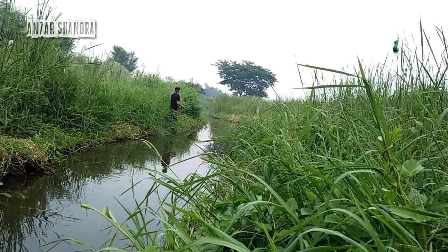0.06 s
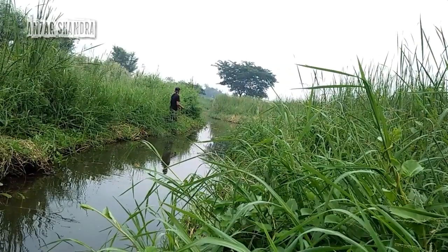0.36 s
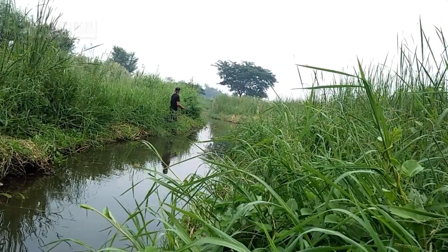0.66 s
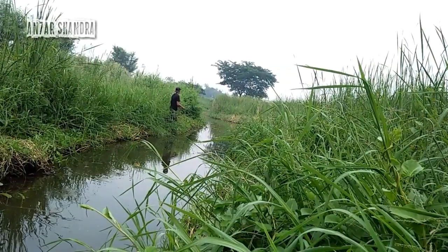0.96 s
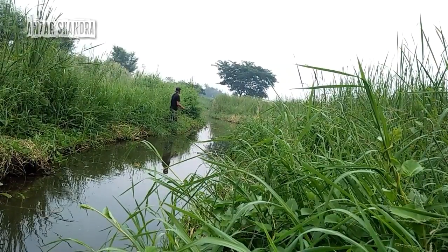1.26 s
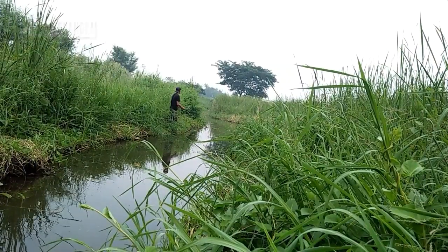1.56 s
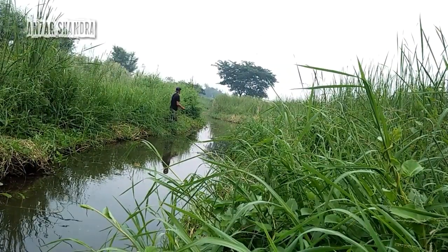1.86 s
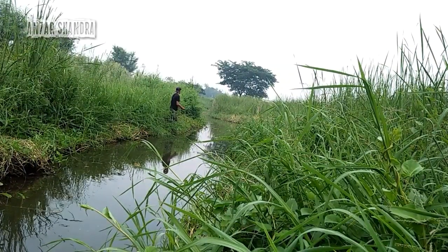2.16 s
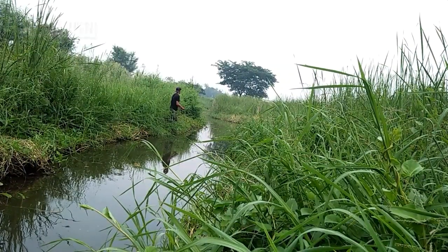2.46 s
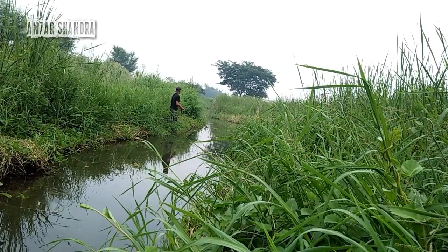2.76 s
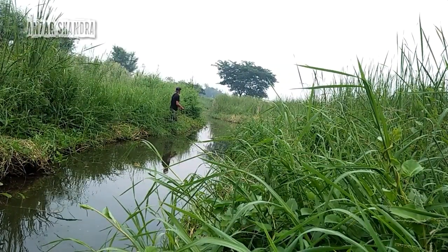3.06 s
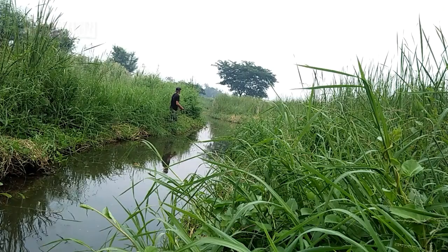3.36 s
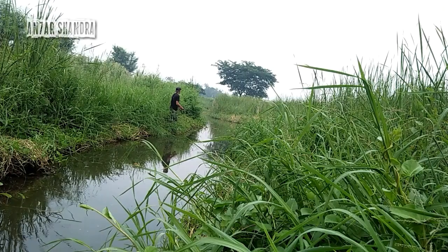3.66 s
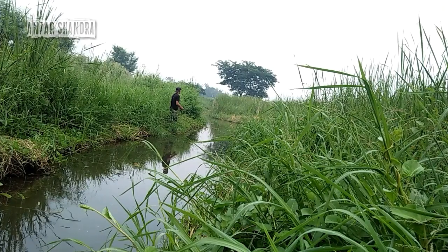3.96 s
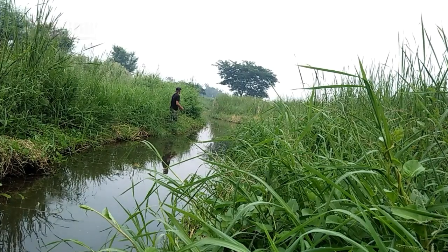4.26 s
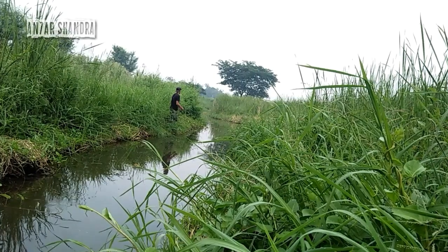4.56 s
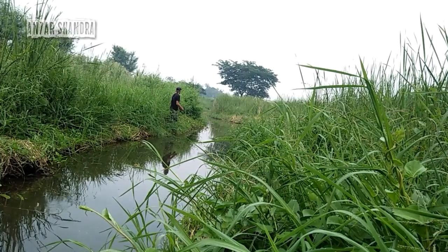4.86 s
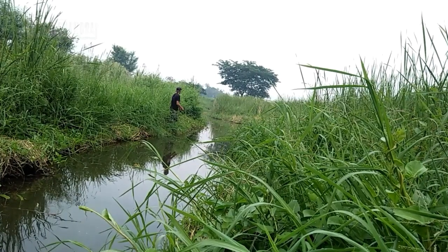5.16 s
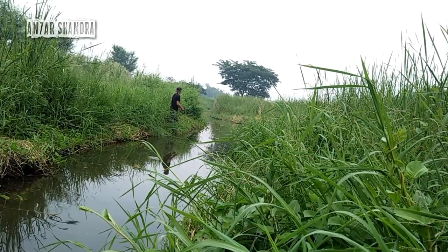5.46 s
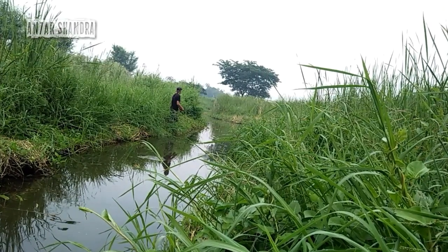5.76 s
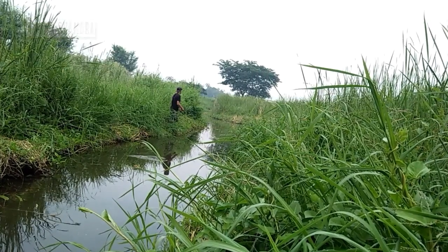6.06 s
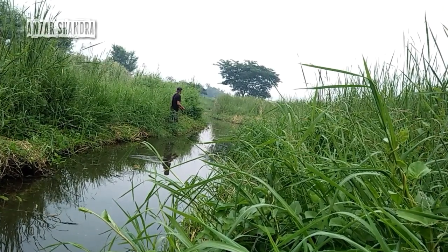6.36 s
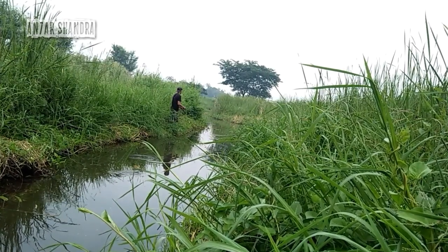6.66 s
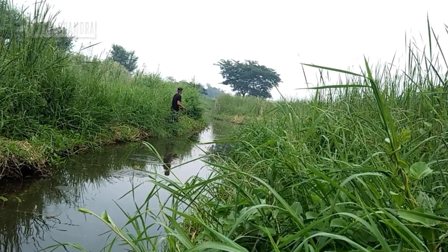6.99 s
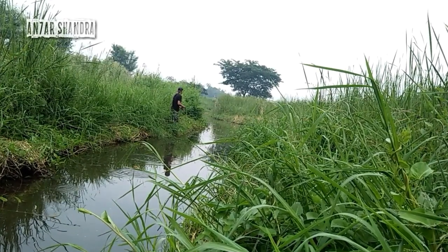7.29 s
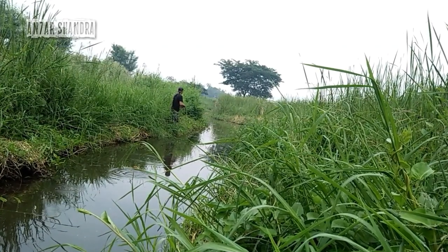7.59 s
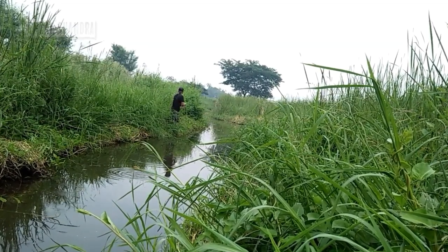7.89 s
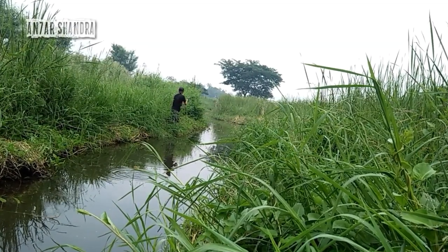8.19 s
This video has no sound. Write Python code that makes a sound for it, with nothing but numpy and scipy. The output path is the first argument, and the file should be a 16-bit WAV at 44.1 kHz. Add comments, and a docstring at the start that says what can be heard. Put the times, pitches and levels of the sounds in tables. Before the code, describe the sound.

Heard from a marsh bank, an angler casts: a sharp click from the reel, a quick swish of the rod, then a thin whizz of line ending in a brief rasp. A short hollow pop follows a little later, and tiny bubbles plip now and then. Insects keep up a shrill, chirping buzz throughout, while a small bird twitters faintly and soft puffs of wind rumble on the microphone.

```python
"""Casting in a reed marsh.

An angler casts: contacts ring the reel with a sharp clack, the rod sheds turbulence in a swish, and
line rubs off the spool until braked in a short rush. Later a cushioned blow gives a hollow pop.
Insects rasp against a resonance, a small bird twitters, a far one whoops and bubbles ring in the water.
Reeds scatter short echoes; a light breeze stirs the leaves and rumbles on the microphone."""
import sys
import numpy as np
from scipy import signal
from scipy.fft import rfft, irfft, next_fast_len
from scipy.io import wavfile
from scipy.ndimage import uniform_filter1d

SR = 44100
rng = np.random.default_rng(int(sys.argv[2]) if len(sys.argv) > 2 else 0)


def digitize_waveform(pressure):
    """Quantize a signal to 16-bit integers and store it at the path in sys.argv[1].

    Rows of a 2-D input are taken as channels; values are limited to [-1, 1].
    """
    field = np.atleast_2d(pressure).T
    bounded = np.clip(field, -1, 1)
    quanta = np.round(bounded * 32767).astype(np.int16)
    wavfile.write(sys.argv[1], SR, quanta)


N = 367353
T = np.arange(N) / SR

# Spectra of the air's hush, the leaves and eddies at the microphone: (frequency [Hz], relative level [dB])
AIR_SPECTRUM = [(120, 10), (200, -1), (300, -2), (480, -0.5), (750, 3), (1100, -4), (1700, -3), (2600, -11),
                (4000, -11), (6000, -19.5), (11000, -12.5), (14300, -22)]
LEAF_SPECTRUM = [(400, -18), (1000, 5), (1600, -1), (2500, -3), (3500, -11.5), (6000, -14), (14300, -9)]
EDDY_SPECTRUM = [(12, -17), (28, -31), (45, -0.5), (56, -7), (63, 2.5), (71, -6.5), (85, -3), (110, -19.5),
                 (160, -23), (220, -40.5), (400, -71)]
# Puffs on the microphone and stirs of air in the leaves: (centre time [s], duration [s], level [dB])
GUSTS = [(.03, 0.09, -46.5), (.22, 0.24, -55), (.62, 0.057, -52), (1.095, 0.084, -51.5), (1.18, .07, -55),
         (1.31, 0.054, -56), (1.48, 0.063, -56), (1.95, 0.04, -53), (3.14, 0.035, -48.5),
         (3.36, 0.036, -48.5), (3.58, 0.064, -53), (3.69, .07, -53.5), (4.8, 0.17, -55.5),
         (5.385, 0.18, -52.5), (5.68, 0.14, -57), (5.805, 0.1, -50), (5.998, 0.086, -46.5),
         (6.25, 0.38, -51.5), (6.5, 0.28, -51), (6.9, 0.14, -52.5), (7.05, 0.23, -52), (7.52, 0.19, -53),
         (8.04, 0.34, -53)]
RUSTLES = [(3.15, 0.49, -73.5)]

# The far bird's rising whoops: (time [s], peak level [dB])
WHOOPS = [(0.071, -63.5), (.31, -71), (.55, -66), (0.775, -70), (1.011, -68.5), (1.23, -67.5)]
# Faint distant hoots: (time [s], duration [s], pitch [Hz], level [dB])
HOOTS = [(0.551, 0.51, 440, -76), (3.77, 0.13, 742, -76), (6.193, 0.11, 899, -70),
         (6.708, 0.078, 735, -66.5), (7.078, 0.14, 901, -69.5), (7.253, 0.2, 701, -73),
         (7.994, 0.23, 451, -72.5)]
# The small bird's phrase of falling slurs: (time before its end [s], pitch [Hz], relative level [dB])
SLURS = [(.5, 3850, -2.5), (0.46, 4100, 2), (.39, 4270, -0.5), (.365, 4680, -1.5), (.265, 4470, -1.5),
         (.2, 4580, -2.5), (0.2, 5130, -3), (.16, 4150, -1.5), (.08, 3730, 3.5), (.045, 4620, -4.5),
         (.028, 4020, 0.5)]
# It sings the whole phrase or only the last part: (end time [s], slurs [count], level [dB])
PHRASES = [(.78, 11, -65), (1.238, 7, -73), (2.07, 9, -60.5), (3.585, 8, -73), (4.001, 11, -66),
           (4.579, 4, -70), (4.73, 3, -71), (5.246, 8, -69), (5.41, 3, -66), (6.62, 6, -79),
           (6.96, 9, -65.5), (7.54, 11, -72), (8.04, 7, -68.5), (8.36, 6, -67)]
# Two arched notes: (delay [s], duration [s], first pitch [Hz], middle pitch [Hz], last pitch [Hz])
FLOURISH_NOTES = [(0, .05, 2850, 3430, 2350), (.06, .056, 2650, 3500, 2800)]
# That flourish, closing most phrases, and higher arched calls: (time [s], level [dB])
FLOURISHES = [(.772, -66), (2.058, -64.5), (3.584, -66), (3.995, -67), (5.235, -67.5), (5.395, -68),
              (6.952, -65.5), (7.545, -68)]
HIGH_CALLS = [(0.502, -60.5), (0.831, -61.5), (1.338, -58), (3.41, -71), (3.76, -65), (4.061, -65)]

# The insects' resonance and the band above it: (frequency [Hz], relative level [dB])
BUZZ_SPECTRUM = [(5800, -46.5), (6500, -35.5), (6950, -22.5), (7250, -13), (7450, -10.5), (7750, -6),
                 (8020, -0.5), (8300, -19), (8650, -19), (9200, -52.5)]
UPPER_BUZZ_SPECTRUM = [(8000, -22.5), (8700, -2), (9400, 0.5), (10000, 1.5), (10300, -9.5), (10800, -16.5),
                       (12000, -25.5), (14300, -17.5)]
# Envelope of the insect chorus: (time [s], level [dB])
CHORUS_LEVEL = [(0.0, -56), (0.22, -45), (0.7, -52), (2.04, -47), (2.16, -54.5), (2.26, -48.5),
                (2.62, -54.0), (3.68, -46.1), (4.36, -53.9), (4.46, -48), (5.1, -51), (5.22, -57),
                (5.32, -49.5), (6.04, -51.5), (6.14, -48), (6.36, -50), (6.54, -45), (6.74, -49.5),
                (7.92, -48.5), (8.04, -53), (8.22, -51.5), (8.32, -47)]
# Runs of chirps at a steady pace: (first chirp [s], rate [1/s], chirps [count])
CHIRP_RUNS = [(0.061, 7.64, 19), (2.508, 10.96, 4), (2.904, 10.84, 16), (4.4, 11.92, 9), (5.154, 9.0, 4),
              (5.622, 8.18, 23)]
# Brief dips as the near insects rest: (centre time [s], duration [s])
RESTS = [(0.162, 0.018), (2.645, .035), (2.844, 0.094), (3.086, 0.031), (4.364, 0.026), (4.596, 0.052),
         (5.561, 0.07), (5.937, 0.031), (6.037, 0.081), (7.156, 0.025)]

# Ringing bubbles: (time [s], duration [s], first pitch [Hz], last pitch [Hz], level [dB])
BUBBLES = [(0.54, 0.016, 1015, 1086, -50), (0.56, .016, 980, 990, -53.5), (0.619, 0.025, 1020, 1050, -54),
           (0.757, 0.019, 980, 860, -52), (2.604, 0.04, 2750, 2720, -66), (2.708, 0.016, 563, 630, -52),
           (5.31, 0.032, 590, 1354, -46.5), (5.326, 0.014, 2190, 2200, -49.5),
           (5.687, 0.038, 1043, 1150, -59.5), (5.726, 0.0064, 720, 920, -48),
           (5.733, 0.0087, 630, 1250, -46), (5.846, 0.011, 1820, 2060, -57), (6.675, 0.027, 948, 1770, -44),
           (7.105, 0.0083, 1970, 2840, -44.5), (7.584, 0.015, 1115, 1270, -54),
           (7.604, 0.01, 2470, 2420, -50)]
# Blows that excite the pop: (time [s], force level [dB])
POP_BLOWS = [(4.0155, -36), (4.0218, -39), (4.0213, -10.5)]
# Modes of the pop: (frequency [Hz], gain [dB], 60 dB decay time [s])
POP_MODES = [(1140, -19, 0.012), (1316, -4, 0.01), (1530, -5.5, 0.0081), (2580, -9, 0.0034)]
# Envelope of the fizz around the pop: (time [s], level [dB])
FIZZ_LEVEL = [(4.005, -84), (4.017, -47), (4.022, -36.5), (4.028, -49.5), (4.05, -57.5), (4.1, -64.5),
              (4.2, -75)]
# Spectrum of that fizz: (frequency [Hz], relative level [dB])
FIZZ_SPECTRUM = [(350, -28), (750, 0), (1400, 3.5), (2500, -3.5), (5000, -6.5), (10000, -10.5),
                 (14300, -16)]

# Contacts on the reel: (time [s], force level [dB], contact cut-off [Hz], relative rattle level [dB])
REEL_CONTACTS = [(0.157, -47, 6000, -13.5), (0.1812, -36, 15100, 1), (0.182, -19.5, 11800, -13.5),
                 (0.185, -22.5, 6000, -21), (1.116, -64, 12000, -17.5), (1.211, -54, 14000, -21),
                 (4.204, -57, 15000, -19), (5.457, -50, 9000, -23.5)]
# Modes of the tackle: (frequency [Hz], gain [dB], 60 dB decay time [s])
TACKLE_MODES = [(1190, -10, 0.0053), (2570, 0.5, 0.0027), (2960, -37, 0.0074), (3740, -19, 0.007),
                (6000, -2, 0.0033), (6900, -20, .004), (11700, -8.5, 0.0024)]
# Spectra of the rod's swish and the line's run, braking and hiss: (frequency [Hz], relative level [dB])
SWISH_SPECTRUM = [(120, -64), (200, -40), (391, -16), (531, -21.5), (710, -10.5), (1100, -7.5),
                  (1780, -2.5), (2600, -8.5), (4650, -8), (6500, -25.5), (8450, -54), (14300, -120)]
RUN_SPECTRUM = [(180, -42), (300, -22), (337, -48), (593, -3), (1320, -2), (2150, 0.5), (3290, -9.5),
                (4650, -6.5), (6500, -23), (8450, -51), (14300, -120)]
BRAKE_SPECTRUM = [(200, -50), (450, -58), (700, -3.5), (880, -5.5), (1060, 6.5), (1240, -9.5), (1600, 1),
                  (2000, -0.5), (2400, -6.5), (3000, -11), (4600, -14), (6500, -31), (9000, -55)]
HISS_SPECTRUM = [(4500, -31), (6500, -0.5), (9000, 6.5), (12000, 3.5), (14300, 3)]
# The rod whips through the air: (time [s], peak level [dB], rise [dB/s], fall [dB/s])
SWISHES = [(1.457, -36.5, 598, 750), (1.498, -35.5, 750, 218)]
# The line is braked: (time [s], peak level [dB], rise [dB/s], fall [dB/s], relative hiss level [dB])
SNATCHES = [(2.233, -51, 400, 204, -6), (2.279, -45, 453, 350, -10), (2.305, -33.5, 850, 850, -23),
            (2.347, -52, 1800, 1500, -16)]
# The rod's whistle sinks as it slows: (time [s], pitch [Hz], level [dB])
ROD_SWOOSH = [(1.44, 1891, -56), (1.495, 1650, -45), (1.53, 1142, -46), (1.57, 865, -52), (1.63, 613, -78),
              (1.7, 598, -78)]
# The line's thin whizz rises, then sinks as the lure slows: (time [s], pitch [Hz], level [dB])
LINE_WHIZZ = [(1.5, 10900, -80), (1.6, 11400, -65), (1.75, 13500, -76), (1.9, 14000, -65),
              (2.05, 13700, -74.5), (2.17, 12300, -64), (2.26, 11000, -68), (2.34, 9500, -90)]


def from_db(db):
    """Amplitude ratio of a level in decibels."""
    return 10 ** (np.asarray(db) / 20)


def rms_one(x):
    """Normalisation to unit mean power."""
    return x / np.sqrt(np.mean(x ** 2) + 1e-20)


def in_time(rows):
    """Linear interpolation of each column of a curve at every sample."""
    times, *columns = np.transpose(rows)
    return [np.interp(T, times, column) for column in columns]


def add(out, s, sound):
    """Superposition: a sound joins the mix at time s."""
    at = max(round(s * SR), 0)
    out[at:at + len(sound)] += sound[:max(N - at, 0)]


def swell(rows):
    """Amplitude envelope from a curve's last column, silent outside its span."""
    return from_db(in_time(rows)[-1]) * (T > rows[0][0]) * (T < rows[-1][0])


def peak(s, db, rise_db_per_s, fall_db_per_s):
    """Exponential growth to a peak at time s, then exponential decay."""
    slope = np.where(T < s, rise_db_per_s, fall_db_per_s)
    return from_db(db - np.minimum(np.abs(slope * (T - s)), 200))


def humps(rows):
    """An envelope of superposed raised-cosine swells."""
    out = np.zeros(N)
    for s, length, db in rows:
        add(out, s - length / 2, from_db(db) * np.hanning(int(length * SR)))
    return out


def gate(start, end, rise_s, fall_s):
    """A trapezoidal envelope, its edges centred on the two times."""
    corners = [start - rise_s / 2, start + rise_s / 2, end - fall_s / 2, end + fall_s / 2]
    return np.interp(T, corners, [0, 1, 1, 0])


def drift(rate):
    """Random modulation of unit rms, passing through `rate` new values a second."""
    return rms_one(np.interp(T * rate, np.arange(N // 20), rng.standard_normal(N // 20)))


def noise(spectrum):
    """Spectral shaping of white noise, at unit rms."""
    size = next_fast_len(N)
    hz, db = np.transpose(spectrum)
    bin_hz = np.maximum(np.arange(size // 2 + 1) * SR / size, 1)
    gain = from_db(np.interp(np.log(bin_hz), np.log(hz), db))
    return rms_one(irfft(rfft(rng.standard_normal(N), size) * gain, size)[:N])


def narrow_noise(hz, width_hz):
    """Random quadrature modulation spreads a steady or gliding pitch into a band of unit rms."""
    phase = 2 * np.pi * np.cumsum(hz + np.zeros(N)) / SR
    return rms_one(drift(width_hz) * np.cos(phase) + drift(width_hz) * np.sin(phase))


def low_pass(x, hz):
    """Two-pole attenuation above a cut-off."""
    return signal.sosfilt(signal.butter(2, min(hz, .45 * SR), fs=SR, output="sos"), x)


def whistle(length, first_hz, middle_hz, last_hz, waver=0.0216):
    """Frequency modulation: a sine swells and fades as its unsteady pitch bends through three points."""
    progress = np.linspace(0, 1, max(int(length * SR), 8))
    parabola = np.polyfit([0, .5, 1], [first_hz, middle_hz, last_hz], 2)
    unsteadiness = np.interp(progress, np.linspace(0, 1, 10), rng.standard_normal(10))
    hz = np.polyval(parabola, progress) * (1 + waver * unsteadiness)
    return np.sin(2 * np.pi * np.cumsum(hz) / SR) * np.abs(np.sin(np.pi * progress)) ** .3


def ring(force, modes):
    """Modal resonance: a force drives damped oscillators, whose sum is high-passed."""
    out = np.zeros(N)
    for hz, db, t60 in modes:
        radius = from_db(-60 / (t60 * SR))
        pole_real = radius * np.cos(2 * np.pi * hz / SR)
        out += from_db(db) * signal.lfilter([1, -pole_real], [1, -2 * pole_real, radius ** 2], force + 1e-18)
    return signal.sosfilt(signal.butter(4, 700, "high", fs=SR, output="sos"), out)


def reeds(x, wet_db, t60, dull_hz):
    """Multiple scattering: countless stems give a sound a short, dull tail."""
    t = T[:SR // 2]
    tail = low_pass(rng.standard_normal(len(t)), dull_hz) * from_db(-60 * t / t60)
    return x + from_db(wet_db) * signal.fftconvolve(x, tail / np.linalg.norm(tail))[:N]


def breeze(air_db=-68.5, waver_db=1.9, leaves_db=-73.5, crinkle_db=4.0, calm_db=-69.0, lump_db=5.5):
    """Turbulence makes a soft hush, stirs the leaves and buffets the microphone."""
    hush = from_db(air_db + waver_db * drift(20)) * noise(AIR_SPECTRUM)
    stirring = from_db(leaves_db) + humps(RUSTLES)
    leaves = stirring * from_db(crinkle_db * drift(150)) * noise(LEAF_SPECTRUM)
    eddies = noise(EDDY_SPECTRUM)
    eddies /= np.sqrt(uniform_filter1d(eddies ** 2, size=SR // 30) + 0.046)   # gusts set the strength
    rumble = from_db(calm_db + lump_db * np.minimum(drift(16), 1)) * noise(EDDY_SPECTRUM)
    return hush + leaves + humps(GUSTS) * eddies + rumble


def far_birds(hoot_width_hz=110):
    """Scattering over distance blurs rising whoops and narrow-band hoots."""
    out = np.zeros(N)
    for s, db in WHOOPS:
        add(out, s, from_db(db) * whistle(length=0.11, first_hz=1043, middle_hz=1220, last_hz=1320))
    for s, length, hz, db in HOOTS:
        arch = np.sqrt(np.hanning(int(length * SR)))
        add(out, s, from_db(db) * arch * narrow_noise(hz, hoot_width_hz)[:len(arch)])
    return reeds(out, wet_db=-8.0, t60=0.26, dull_hz=3000)


def slur(length, hz, glide_hz=286):
    """A linear frequency sweep falling through a pitch."""
    return whistle(length, hz + glide_hz, hz, hz - glide_hz)


def small_bird(slur_s=0.023, grace_db=-10, grace_s=.09, grace_hz=4350, grace_spread_hz=550, rasp_db=4.0):
    """Frequency sweeps form a hurried song with soft grace notes; amplitude modulation roughens it."""
    song = np.zeros(N)
    for end, count, db in PHRASES:
        for before, hz, note_db in SLURS[-round(count):]:
            when, step, stretch = rng.uniform(-1.1, 1, 3)
            start = end - before - slur_s / 2
            length = slur_s * (1 + .3 * stretch)
            add(song, start, from_db(db + note_db) * slur(length, hz))
            grace_note = slur(length, grace_hz + grace_spread_hz * step)
            add(song, start + grace_s * when, from_db(db + grace_db) * grace_note)
    for s, db in FLOURISHES:
        for delay, *arch in FLOURISH_NOTES:
            add(song, s + delay, from_db(db) * whistle(*arch))
    for s, db in HIGH_CALLS:
        add(song, s, from_db(db) * whistle(length=0.071, first_hz=3950, middle_hz=4370, last_hz=3950))
    return reeds(song * from_db(rasp_db * drift(400)), wet_db=-10, t60=.25, dull_hz=6500)


def chorus_gain(duty=0.73, rise_s=0.015, fall_s=0.023, jitter_s=0.0092,
                chirp_db=-0.5, spread_db=1.0, far_db=-2.5, rest_db=-6):
    """Incoherent sources add in power: uneven chirps over far insects, dipping at each rest."""
    power = np.zeros(N)
    for first, rate, count in CHIRP_RUNS:
        length = duty / rate + (rise_s + fall_s) / 2
        t = T[:int(length * SR)]
        chirp = np.clip(np.minimum(t / rise_s, (length - t) / fall_s), 0, 1)
        for k, (late, strong) in enumerate(rng.standard_normal((int(count), 2))):
            start = first + k / rate - length / 2 + jitter_s * late
            add(power, start, (from_db(chirp_db + spread_db * strong) * chirp) ** 2)
    resting = sum(gate(s - length / 2, s + length / 2, fall_s, rise_s) for s, length in RESTS)
    return from_db(in_time(CHORUS_LEVEL)[0] + rest_db * resting) * np.sqrt(power + from_db(far_db) ** 2)


def insects(stroke_hz=112.5, ring_hz=7940, tone_share=0.25, flutter_db=1.38, throb_db=0.88, upper_db=-14):
    """Stridulation: rapid rasping strokes pulse a sharp resonance and a weaker band above it."""
    stroke_phase = 2 * np.pi * np.cumsum(stroke_hz * (1 + 0.0309 * drift(12))) / SR
    pulses = rms_one(1 + 0.15 * np.cos(stroke_phase) + 0.081 * np.cos(2 * stroke_phase))
    # the nearest insect rings almost purely, its pitch wandering from stroke to stroke
    pitch_hz = ring_hz + 90 * drift(40) + 130 * drift(700)
    tone = rms_one(np.sin(2 * np.pi * np.cumsum(pitch_hz) / SR))
    resonance = np.sqrt(1 - tone_share) * noise(BUZZ_SPECTRUM) + np.sqrt(tone_share) * tone
    resonance *= from_db(flutter_db * drift(70) + throb_db * drift(28))
    chirps = chorus_gain()
    upper_band = from_db(upper_db + 1.2 * drift(4.5)) * noise(UPPER_BUZZ_SPECTRUM)
    return chirps * pulses * (resonance + upper_band)


def bubbles(damping_db=7, gurgle_db=-17, gurgle_s=.1, gurgle_fade_db=10, gurgle_count=6, wobble_db=1.5):
    """Volume resonance: each bubble rings, mostly rising as it nears the surface, and sheds weaker ones."""
    out = np.zeros(N)
    for s, length, first_hz, last_hz, db in BUBBLES:
        tone = whistle(length, first_hz, np.sqrt(first_hz * last_hz), last_hz)
        decay = from_db(db - np.linspace(0, damping_db, len(tone)))
        add(out, s, decay * tone * np.hanning(len(tone)) ** 0.11)
        for when, octave in rng.random((gurgle_count, 2)):
            hz = last_hz * 2 ** (octave - 1)
            gain = from_db(db + gurgle_db - gurgle_fade_db * when)
            add(out, s + length / 2 + gurgle_s * when, gain * whistle(length / 2, hz, hz, 1.36 * hz))
    return reeds(out * from_db(wobble_db * drift(350)), wet_db=-19, t60=0.25, dull_hz=3020)


def pop(contact_hz=2100):
    """Impulse response: a cushioned blow rings hollowly for a few cycles, wrapped in a short fizz."""
    force = np.zeros(N)
    for s, db in POP_BLOWS:
        add(force, s, from_db([db]))
    return ring(low_pass(force, contact_hz), POP_MODES) + swell(FIZZ_LEVEL) * noise(FIZZ_SPECTRUM)


def tackle(rattle_t60=0.02):
    """Impact excitation: contacts on the reel, each with a brief rattle, ring its damped modes."""
    force, t = np.zeros(N), T[:SR // 20]
    for s, db, contact_hz, rattle_db in REEL_CONTACTS:
        push = from_db(rattle_db - 60 * t / rattle_t60) * rng.standard_normal(len(t))
        push[0] = 1   # the impact itself
        add(force, s, from_db(db) * low_pass(push, contact_hz))
    return reeds(ring(force, TACKLE_MODES), wet_db=-17, t60=0.098, dull_hz=6860)


def cast(full_speed_s=1.536, brake_s=2.1, spin_up_db_per_s=90, brake_db_per_s=250,
         swish_hiss_db=-8, grain_db=1.0, loops_db=2.0):
    """Turbulence and friction: the rod cuts the air; line rubs off the spool in loops and is braked."""
    swishing = sum(peak(*row) for row in SWISHES)
    unbraked = from_db(-brake_db_per_s * np.clip(T - brake_s, 0, 1))
    # the rush of the line dies away as the lure slows
    running = unbraked * peak(full_speed_s, -51.5, spin_up_db_per_s, fall_db_per_s=33.5)
    running_hiss = unbraked * peak(full_speed_s, -62, spin_up_db_per_s, fall_db_per_s=7)
    braking = sum(peak(*shape) for *shape, _ in SNATCHES)
    braking_hiss = sum(from_db(hiss_db) * peak(*shape) for *shape, hiss_db in SNATCHES)
    hissing = from_db(swish_hiss_db) * swishing + braking_hiss + running_hiss
    rush = (swishing * noise(SWISH_SPECTRUM) + running * noise(RUN_SPECTRUM)
            + braking * noise(BRAKE_SPECTRUM) + hissing * noise(HISS_SPECTRUM))
    swoosh = swell(ROD_SWOOSH) * narrow_noise(in_time(ROD_SWOOSH)[0], width_hz=480)
    whizz = swell(LINE_WHIZZ) * narrow_noise(in_time(LINE_WHIZZ)[0], width_hz=2500)
    unevenness = from_db(grain_db * drift(600) + loops_db * drift(70))
    return unevenness * rush + swoosh + whizz


def scene():
    """Superposition of all sources as heard from the bank, in one channel."""
    return (insects() + small_bird() + far_birds() + bubbles() + cast() + tackle() + pop() + breeze())[None]


def record(dry, cutoff_hz=14250):
    """Band limiting: a steep low-pass removes the highest treble."""
    return signal.sosfilt(signal.ellip(10, .1, 70, cutoff_hz, fs=SR, output="sos"), dry)


dry = scene()
out = record(dry)
digitize_waveform(out)
```